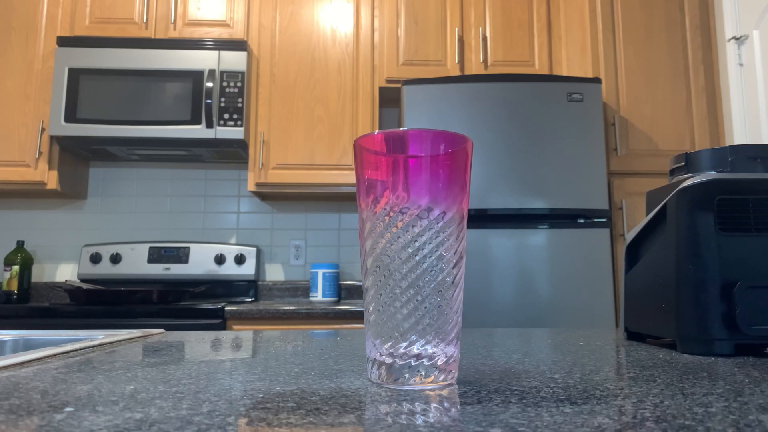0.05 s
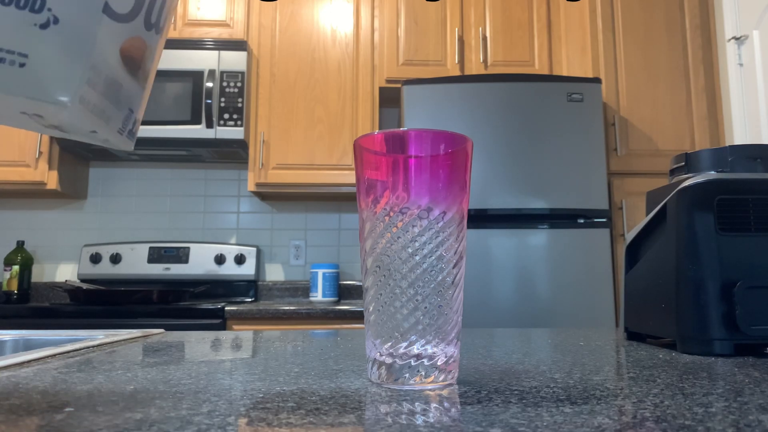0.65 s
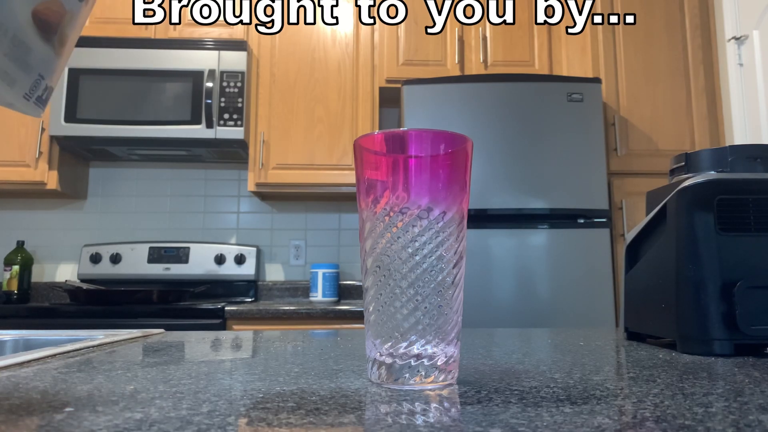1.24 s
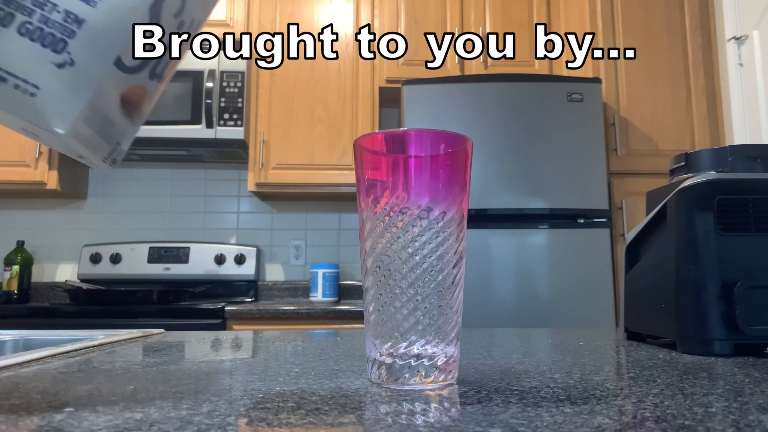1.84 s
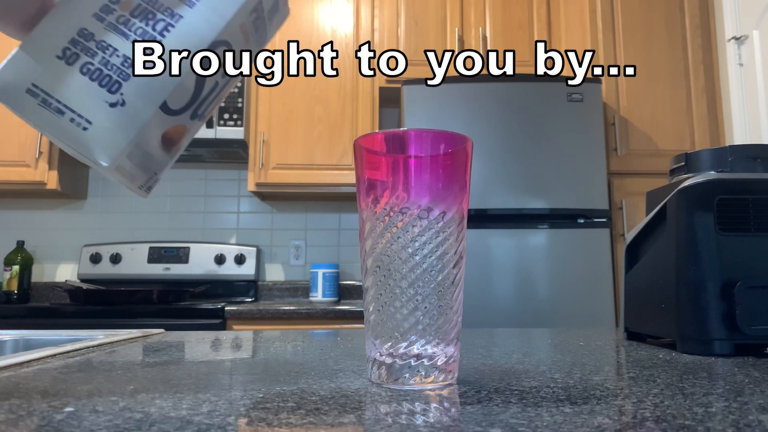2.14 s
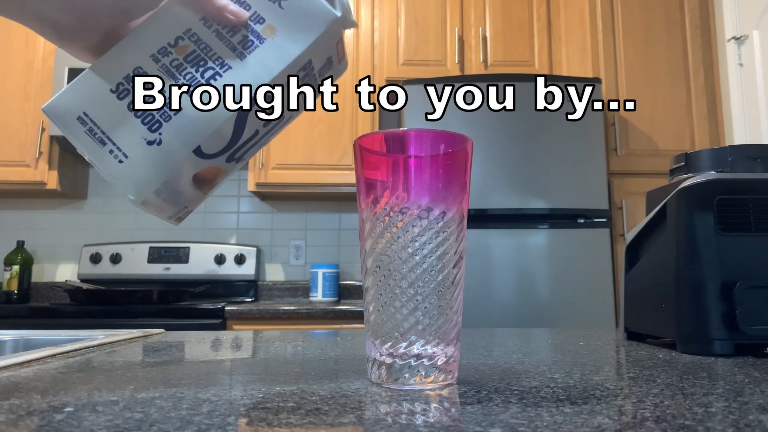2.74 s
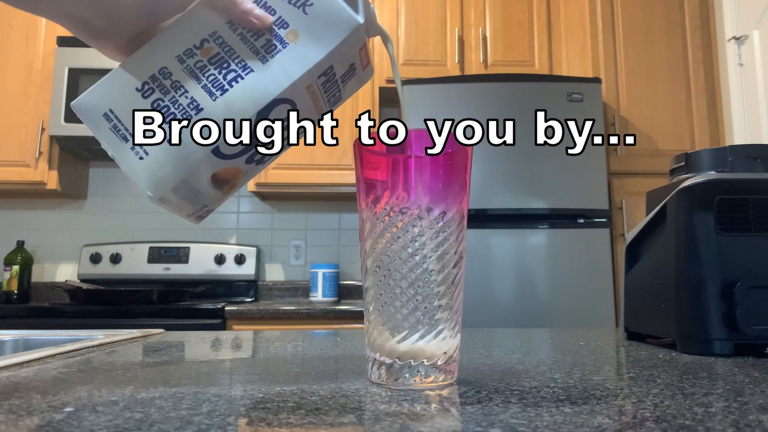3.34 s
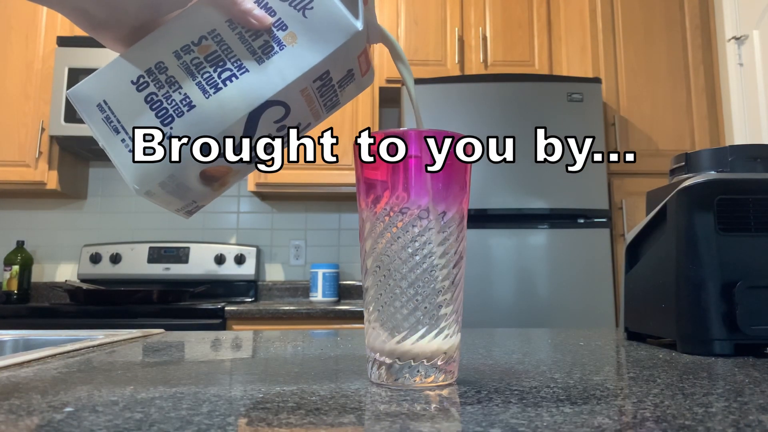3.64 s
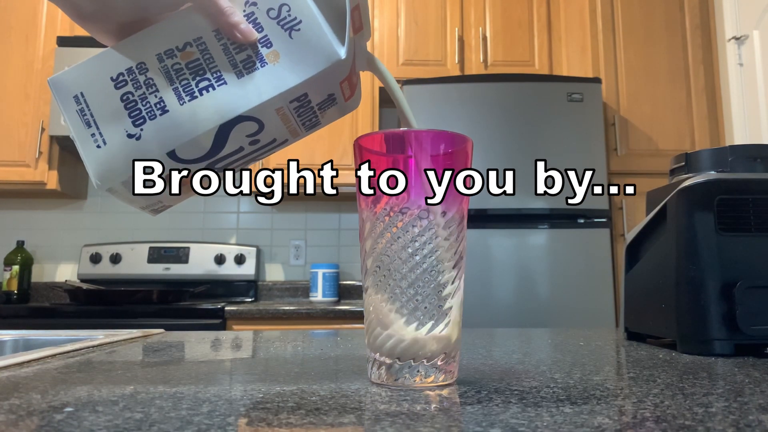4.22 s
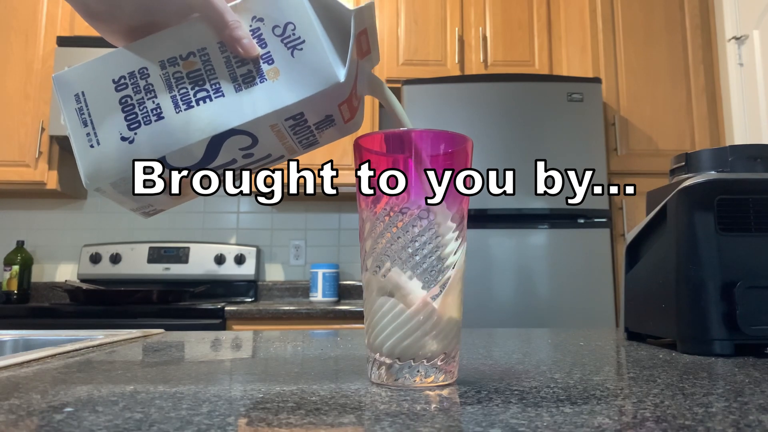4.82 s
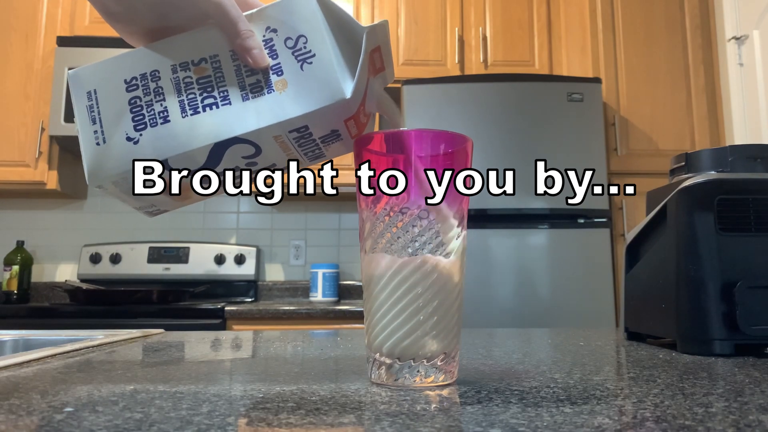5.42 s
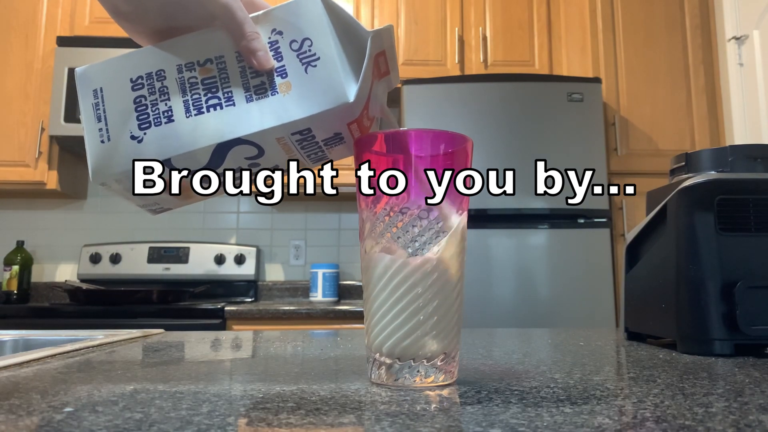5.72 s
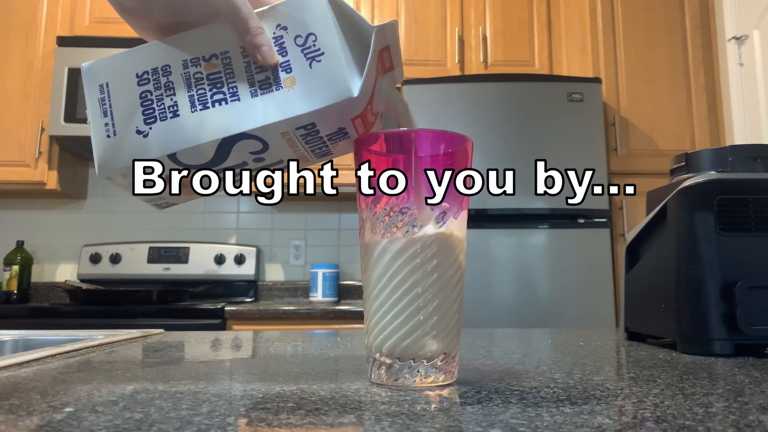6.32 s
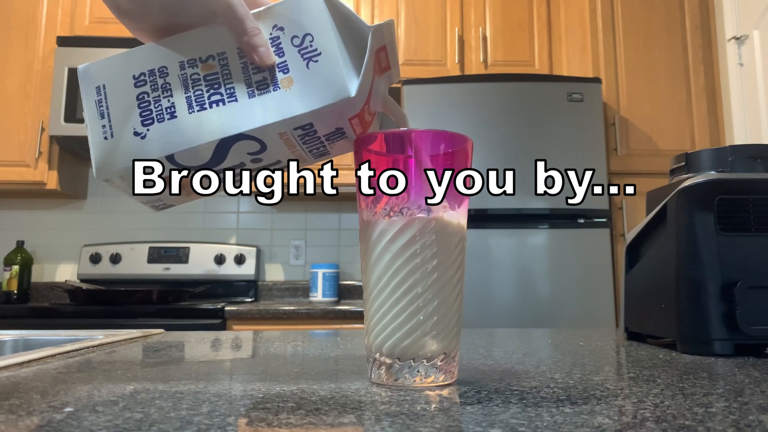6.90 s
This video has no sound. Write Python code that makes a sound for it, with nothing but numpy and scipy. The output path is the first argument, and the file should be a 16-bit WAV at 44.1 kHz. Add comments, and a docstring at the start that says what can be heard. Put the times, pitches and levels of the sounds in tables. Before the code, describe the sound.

A fridge hums in a kitchen while milk from a carton splashes, bubbles and glugs into a glass close by.

```python
"""Milk is poured into a tall glass on a kitchen counter, close by, after the carton lifts with soft swishes.
The stream traps bubbles that plink and fizz, and the air in the glass rises in pitch as it fills.
Tipped further, the carton glugs and drops slugs of milk that plop and spray.
The hard walls of the kitchen echo, and a fridge hums in the background."""
import sys
import numpy as np
from scipy import signal
from scipy.fft import rfft, irfft
from scipy.io import wavfile
from scipy.ndimage import uniform_filter1d

SR = 44100
rng = np.random.default_rng(int(sys.argv[2]) if len(sys.argv) > 2 else 0)


def wav_record(signal):
    """Record a signal, one row per channel, as 16-bit PCM in the file named by sys.argv[1]."""
    frames = np.transpose(np.atleast_2d(signal))
    bounded = np.clip(frames, -1, 1)
    # unit amplitude maps onto the largest positive 16-bit level
    quanta = np.round(bounded * 32767).astype(np.int16)
    wavfile.write(sys.argv[1], SR, quanta)


N = 311346

# How hard the milk churns. Each row: time in seconds, level of low fizz in dB, level of fine fizz in dB.
CHURN = [(3.899, -72, -71), (4.36, -56.5, -66), (4.66, -72, -69), (5.01, -54, -61), (5.22, -59, -61),
         (5.4, -60, -59), (5.8, -56, -50), (6.08, -49.5, -50.5), (6.52, -48.5, -51), (6.67, -50.5, -57.5),
         (6.79, -66, -64), (7.05, -57, -74)]
DROPLET_HZ = 4460  # pitch of a middle-sized droplet
SWELL_SHARE = 0.18  # part of its ring time that a plink or gurgle spends swelling


def undb(db):
    """Turn decibels into a gain."""
    return 10 ** (np.asarray(db) / 20)


def unit(x):
    """Scale a signal to an average (rms) level of one."""
    return x / np.sqrt(np.mean(x ** 2))


def at_hz(points, hz):
    """Read between (Hz, value) points, giving every octave the same room."""
    freqs, values = np.transpose(points)
    return np.interp(np.log(np.maximum(hz, 1)), np.log(freqs), values)


def colour(x, points):
    """Shape the tone of a sound with a curve of (Hz, dB) points."""
    n = x.shape[-1]
    return irfft(rfft(x) * undb(at_hz(points, np.fft.rfftfreq(n, 1 / SR))), n)


def band(x, lo_hz, hi_hz, order=2):
    """Keep the part of a sound between two frequencies."""
    sos = signal.butter(order, [lo_hz, min(hi_hz, SR / 2 - 1)], "band", fs=SR, output="sos")
    return signal.sosfilt(sos, x)


def add(out, s, x):
    """Mix x into out, starting at s seconds."""
    i = max(int(s * SR), 0)
    out[i:i + len(x)] += x[:max(len(out) - i, 0)]


def walk(per_s):
    """A smooth random wander, about one in size, with per_s steps a second."""
    hold = int(SR / per_s)
    steps = np.repeat(rng.standard_normal(N // hold + 1), hold)
    return unit(uniform_filter1d(uniform_filter1d(steps, hold), hold)[:N])


def seconds(length):
    """The time of each sample in a short sound."""
    return np.arange(int(length * SR)) / SR


def resonator(x, hz, width_hz):
    """Ring at a moving pitch: shift that pitch down to zero, smooth, and shift back."""
    carrier = np.exp(2j * np.pi * np.cumsum(hz) / SR)
    pole = np.exp(-np.pi * width_hz / SR)
    return 2 * np.real(carrier * signal.lfilter([1 - pole], [1, -pole], (x + 1e-18) / carrier))


def room_noise(spectrum, db, waver_db):
    """Steady noise that is alike at both ears in the bass and spread out higher up."""
    # Stereo width. Each row: frequency in Hz, side (what differs between the ears) against mid in dB.
    width = [(60, -12.5), (110, -18), (200, -13), (380, -4), (700, 0), (1300, 2), (2400, 0.5), (8000, 0.5),
             (15000, -18)]
    mid, side = unit(colour(rng.standard_normal((2, N)), spectrum))
    return undb(db + waver_db * walk(7.1)) * (mid + colour(side, width) * np.array([[1], [-1]]))


def fridge(waver_db=0.84, drift_hz=0.64, lean_left_db=0.52, ear_lag_s=0.00043):
    """The compressor rumbles, the motor's tones waver and the fan hisses faintly."""
    # Motor and fan tones. Each row: pitch in Hz, level in dB.
    hum = [(59.2, -58), (96.9, -51.5), (157, -51), (320, -64), (429, -72), (559.9, -65.5), (590, -68),
           (651.4, -66.5), (710.6, -64), (5141, -88), (5200, -94)]
    # Tone of the rumble and of the hiss. Each row: frequency in Hz, relative level in dB.
    rumble_curve = [(15, -32), (25, -34), (47, -1.5), (102, -8), (119, -4.5), (152, -3), (227, -8.5),
                    (253, -14), (324, -14), (396, -24), (421, -20.5), (448, -18.5), (723, -27), (757, -34),
                    (1000, -46), (1300, -77), (2200, -120)]
    hiss_curve = [(530, -8.5), (900, 5), (1030, 0.5), (2820, -11), (3460, -16.5), (4180, -10.5),
                  (5310, -19), (6820, -25), (11800, -32.5), (13300, -26), (15500, -39)]
    t = np.arange(N) / SR
    tones = 0
    for hz, db in hum:
        peak = np.sqrt(2) * undb(db + waver_db * walk(5.045))
        cycles = hz * t + drift_hz * np.cumsum(walk(8)) / SR
        tones += peak * np.sin(2 * np.pi * cycles)
    rumble = room_noise(rumble_curve, db=-42.5, waver_db=1.5)
    # The fan stands to the right, so its direct hiss reaches the left ear later.
    right = undb(-70) * unit(colour(rng.standard_normal(N), hiss_curve))
    left = np.roll(right, round(ear_lag_s * SR))
    hiss = np.array([left, right]) + room_noise(hiss_curve, db=-65, waver_db=-1.0)
    return (rumble + tones + hiss) * undb([[lean_left_db], [-lean_left_db]])


def kitchen(x, echo_db=-12, early_db=-8, early_s=0.0051, build_s=0.00033):
    """Counter and glass throw back quick reflections; tiles and cabinets ring on, differently per ear."""
    # Tone of the echo. Each row: frequency in Hz, relative level in dB.
    echo_curve = [(100, 5), (250, 11.6), (450, 6.8), (620, 1.6), (820, 4.5), (1400, 4.4), (2400, 9),
                  (4400, 10.8), (8000, 11.5), (15000, 4.7)]
    # Stereo width of the echo. Each row: frequency in Hz, side against mid in dB.
    echo_width = [(110, -17), (200, -15), (400, -3.5), (750, -6.5), (1400, 1), (2400, 1), (8000, -2),
                  (15000, -13)]
    # Length of the echo. Each row: frequency in Hz, seconds to fade by 60 dB.
    fade_times = [(100, 0.43), (620, 0.37), (1000, 0.3), (2500, 0.32), (6000, 0.34), (15000, 0.34)]
    t = seconds(0.96)
    edges_hz = np.geomspace(60, 16000, 13)
    tail = 0
    for lo, hi in zip(edges_hz, edges_hz[1:]):
        hz = np.sqrt(lo * hi)
        mid, side = band(rng.standard_normal((2, len(t))), lo, hi, order=3)
        width = undb(at_hz(echo_width, hz))
        ears = (mid + width * side * np.array([[1], [-1]])) / np.hypot(1, width)
        tail += ears * np.exp(-np.log(1000) * t / at_hz(fade_times, hz))
    tail = colour(unit(tail), echo_curve) * (1 - np.exp(-t / build_s))
    early_noise = band(rng.standard_normal((2, len(t))), 740, 8400, order=1)
    early = unit(early_noise * t * np.exp(-2 * t / early_s))
    response = (undb(echo_db) * tail + undb(early_db) * early) / np.sqrt(len(t))
    return x + signal.fftconvolve(x[None], response, axes=1)[:, :N]


def rim(x, delay_s=0.0004):
    """Short sound waves bounce off the rim of the glass and differ between the ears."""
    # Strength of the bounce. Each row: frequency in Hz, side against mid in dB.
    bounce_curve = [(500, -18), (1500, -40), (4400, -15), (8000, -11), (13000, -2.5)]
    return np.roll(colour(x, bounce_curve), int(delay_s * SR)) * np.array([[1], [-1]])


def handling(flutter_db=3.5):
    """Hand and carton brush softly as the carton is picked up and swung over."""
    # Each row: loudest moment in seconds, half length in seconds, level in dB, treble change in dB.
    swishes = [(0.01, 0.14, -71, 3), (0.506, 0.12, -74, 2.5), (1.187, 0.17, -69.5, -4.5)]
    # Tone of a swish. Each row: frequency in Hz, relative level in dB.
    swish_curve = [(700, -3), (1500, 5.5), (3000, -0.5), (5000, -4.5), (8000, -12), (15000, -21)]
    t = np.arange(N) / SR
    out = np.zeros(N)
    for s, half_s, db, treble_db in swishes:
        brush = unit(colour(rng.standard_normal(N), swish_curve))
        swell = np.exp(-((t - s) / half_s) ** 2 / 2)
        out += undb(db) * swell * colour(brush, [(3000, 0), (8000, treble_db)])
    return out * undb(flutter_db * walk(25))


def landing(at_s=3.04, half_s=0.11, db=-51.5, flutter_db=1.5):
    """The smooth stream meets the thick bottom of the empty glass with a low, soft drumming."""
    # Tone of the drumming. Each row: frequency in Hz, relative level in dB.
    drum_curve = [(100, -30), (200, 4), (290, -2), (360, -6), (430, -15), (800, -31), (2000, -62),
                  (6000, -85)]
    swell = np.exp(-((np.arange(N) / SR - at_s) / half_s) ** 2 / 2)
    return swell * undb(db + flutter_db * walk(20)) * unit(colour(rng.standard_normal(N), drum_curve))


def bubble(hz, db, swell_ms, ring_ms, glide, fade_power=1.33):
    """A pocket of air pinches off and rings until the milk stills it; its pitch slides as it rises."""
    ms = np.arange(int(3 * ring_ms * SR / 1000) + 2) * 1000 / SR
    t = ms / 1000
    swell = np.minimum(ms / max(swell_ms, .1), 1)
    fade = np.exp(-(ms / ring_ms) ** fade_power)  # a power above 1 holds on, then dies abruptly
    cycles = hz * t * (1 + glide * t / 2)  # a glide of 10 raises the pitch 1% each millisecond
    return undb(db) * swell * fade * np.sin(2 * np.pi * cycles)


def crackle(t, burst_samples=24):
    """Wet noise: tiny bursts of unequal size."""
    sizes = undb(4 * np.clip(rng.standard_normal(len(t) // burst_samples + 1), -2, 2))
    return rng.standard_normal(len(t)) * np.repeat(sizes, burst_samples)[:len(t)]


def churn_at(s, hz):
    """Level of the churning in dB at a given moment, for bubbles of a given pitch."""
    times, low_db, fine_db = np.transpose(CHURN)
    fine_share = at_hz([(2500, 0), (4500, 1)], hz)
    return (1 - fine_share) * np.interp(s, times, low_db) + fine_share * np.interp(s, times, fine_db)


def fizz(per_s=1000, gain_db=1.0, spread_db=5, glide=6, glide_spread=25):
    """Small bubbles swarm where the stream plunges in, each sliding its own way; the smallest die first."""
    # Tone of the fizz. Each row: bubble pitch in Hz, relative level in dB.
    fizz_curve = [(1000, -6), (1500, -16), (2400, -6.5), (3300, -10), (4300, -4.5), (5500, -9), (7000, -10),
                  (9500, -12.5), (15000, -26)]
    out = np.zeros(N)
    first, last = CHURN[0][0], CHURN[-1][0]
    when, height, loud, length, rise = rng.random((int(per_s * (last - first)), 5)).T
    starts = first + when * (last - first)
    pitches = 1000 * 15 ** height  # 1 to 15 kHz
    extra_db = spread_db * np.minimum(-np.log(1 - loud), np.pi)  # a few bubbles stand out
    levels = churn_at(starts, pitches) + at_hz(fizz_curve, pitches) + gain_db + extra_db
    rings_ms = (0.8 + 1.4 * length) * np.sqrt(4000 / pitches)
    slides = glide + glide_spread * (2 * rise - 1)
    for s, hz, db, ring_ms, slide in zip(starts, pitches, levels, rings_ms, slides):
        add(out, s, bubble(hz, db, ring_ms / 5, ring_ms, slide))
    return out


def gurgle(start_s=4.88, end_s=6.62, per_s=70, middle_hz=2640, octaves=1.76, spread_db=9):
    """Middle-sized bubbles chirp while the stream plunges deep, louder as the milk churns harder."""
    out = np.zeros(N)
    for when, height, loud, rise in rng.random((int(per_s * (end_s - start_s)), 4)):
        s = start_s + when * (end_s - start_s)
        hz = middle_hz * 2 ** (octaves * (height - .5))
        db = churn_at(s, hz) + spread_db * (loud - .5)
        ring_ms = 2.9 * middle_hz / hz
        add(out, s, bubble(hz, db, SWELL_SHARE * ring_ms, ring_ms, glide=8 + 30 * (rise - .5)))
    return out


def swarm(length_ms, lo_hz, hi_hz, straggle=1.6, spread_db=18, fade_db=11, droplet_ms=1.9):
    """A burst of tiny bubbles, crowded at its start and trailing off."""
    out = np.zeros(SR // 5)
    count = 4 + int(length_ms / 2)
    for when, height, loud in rng.random((40, 3))[:count]:
        hz = lo_hz * (hi_hz / lo_hz) ** height
        ring_ms = droplet_ms * np.sqrt(DROPLET_HZ / hz)
        late = when ** 1.4
        ping = bubble(hz, spread_db * loud - fade_db * late, ring_ms / 3, ring_ms, glide=8)
        add(out, straggle * length_ms * late / 1000, ping)
    return out * np.sqrt(length_ms * SR / 1000 / np.sum(out ** 2))  # a power of one over length_ms


def splashes(droplets_db=-2.5, mist_db=-9, mist_stretch=1.6, mist_attack_s=0.0016):
    """Milk slaps the glass and breaks into droplets and bubbles of five sizes; a fine mist fizzes on."""
    # Each row: start in seconds, base length in ms, relative level in dB, brightness in dB per octave.
    hits = [(3.516, 6, -74, -10), (3.945, 13.6, -61.5, -2), (4.23, 11.3, -58, -3.5), (4.289, 18, -56, 2),
            (4.638, 22, -60, -1.5), (4.659, 13, -63, 4), (4.687, 20, -56, -3.5), (4.81, 5.1, -63, 0),
            (4.874, 14, -65, -12), (4.886, 30.4, -56.5, -9), (4.897, 24, -63.5, 3), (5.036, 8.6, -60.5, -4),
            (5.056, 7.4, -56, -3), (5.097, 6.1, -58, -8.5), (5.13, 6.4, -61, -8), (5.222, 6, -59, -3.5),
            (5.244, 9.6, -57, -3), (5.288, 15.5, -62, 8.5), (5.321, 16, -50.5, -7),
            (5.369, 11.4, -56, -5.5), (5.53, 14.5, -54.5, -4), (5.553, 14, -68, 2), (5.582, 13, -62, -12),
            (5.712, 16.4, -56, 2), (5.761, 6.5, -54, -2), (5.782, 22, -55, -7), (5.866, 11.5, -50, 1),
            (5.873, 18, -49.5, 0), (6.004, 8.6, -51, -5), (6.031, 32, -61.5, -15), (6.115, 7.6, -53, 0.5),
            (6.209, 9, -47, -0.5), (6.4257, 9.5, -46, 7.5), (6.499, 10.4, -58, -11), (6.545, 6.2, -46, -6),
            (6.603, 24, -53.5, 6.5)]
    # Droplet sizes. Each row: lowest pitch in Hz, highest pitch in Hz, relative level in dB.
    droplets = [(1525, 3380, 0), (3640, 5240, -4.5), (5500, 8000, -2), (8280, 11440, -3),
                (11900, 15400, -10)]
    out = np.zeros(N)
    t = seconds(.2)
    for s, length_ms, db, brightness_db in hits:
        mist_curve = [(800, -40)]
        for lo, hi, size_db in droplets:
            hz = np.sqrt(lo * hi)
            band_db = size_db + brightness_db * np.log2(hz / DROPLET_HZ)
            add(out, s, undb(db + band_db + droplets_db) * swarm(length_ms, lo, hi))
            narrow_db = 10 * np.log10(SR / 2 / (hi - lo))  # a narrow band needs a boost to be as strong
            mist_curve.append((hz, band_db + narrow_db))
        mist_s = mist_stretch * length_ms / 1000
        fade = (1 - np.exp(-t / mist_attack_s)) * np.exp(-t / mist_s)
        add(out, s, undb(db + mist_db) * fade * colour(unit(crackle(t)), mist_curve))
    return out


def glass(x, direct_db=-3.5, slosh_share=0.047):
    """The air above the milk rings like a pipe that shortens as the glass fills; the wall rings too."""
    # Lowest note of that air. Each row: time in seconds, pitch in Hz.
    air_pitch = [(3.9, 556), (4.9, 507), (5.7, 630), (6.201, 810), (6.6, 835), (7.05, 860)]
    # All its notes. Each row: multiple of the lowest pitch, width in Hz, gain in dB.
    air_notes = [(1, 207, 11.5), (3, 69, -4.5), (5.2, 190, -16), (8, 220, -8)]
    # Faint notes of the wall, struck by droplets. Each row: pitch in Hz, width in Hz, gain in dB.
    wall_notes = [(4200, 50, -2), (4720, 60, -6), (6760, 90, -2), (7250, 53, -9), (10380, 90, -2),
                  (12600, 120, 4)]
    lowest_hz = np.interp(np.arange(N) / SR, *np.transpose(air_pitch))
    lowest_hz *= 1 + slosh_share * walk(30)  # sloshing makes the pitch waver
    air = sum(undb(db) * resonator(x, multiple * lowest_hz, width) for multiple, width, db in air_notes)
    wall = sum(undb(db) * band(x + 1e-18, hz - width / 2, hz + width / 2, order=1)
               for hz, width, db in wall_notes)
    return undb(direct_db) * x + air + wall


def free_bubble(hz, db, glide, middle_ms=11, middle_hz=1020, rise_stretch_s=0.023):
    """A bubble in open milk: small ones die soonest, rising ones last longer."""
    ring_ms = middle_ms * (middle_hz / hz) * np.exp(rise_stretch_s * glide)
    return bubble(hz, db, SWELL_SHARE * ring_ms, ring_ms, glide, fade_power=2.1)


def plinks(gain_db=1.0, tear_db=-15, tear_s=0.0065, reach_hz=1000):
    """The stream drags larger bubbles under; each tears off with a brief wet crackle around its pitch."""
    # Each row: start in seconds, pitch in Hz, relative level in dB, pitch glide per second.
    bubbles = [(3.039, 4450, -61, 0), (3.516, 1850, -47, 0), (3.517, 1450, -53, -12),
               (3.983, 1230, -47.5, 5), (4.005, 1360, -49, 11.5), (4.087, 5900, -52.5, -4),
               (4.171, 5600, -46, -12), (4.211, 4320, -35.5, -17), (4.232, 3580, -44, 0),
               (4.233, 2760, -41.5, -4), (4.243, 770, -46, 8), (4.291, 796, -47.5, 12.5),
               (4.311, 1040, -48, 24), (4.321, 4480, -36.5, -24), (4.367, 1445, -41, 3),
               (4.444, 2240, -54, 6), (4.495, 1863, -52, -11), (4.521, 640, -28, 6.5),
               (4.533, 6700, -47.5, -7), (4.619, 1614, -34, 1), (4.621, 600, -27, -4),
               (4.659, 2470, -40.5, 2), (4.688, 653, -37.5, 12.5), (4.813, 2780, -41.5, 4),
               (4.887, 1510, -30, -17), (4.901, 1700, -37, -14), (4.909, 1100, -39, -17),
               (4.919, 594, -18, 2), (4.962, 825, -48, 21), (4.962, 7130, -47.5, 2), (4.976, 1910, -52, 40),
               (4.99, 1530, -38.5, 18), (4.999, 2300, -47, 18), (5.013, 1640, -42.5, 13),
               (5.038, 2610, -38.5, -12), (5.038, 735, -43, 2.5), (5.071, 1390, -47, -2),
               (5.059, 12400, -51, 0), (5.072, 2660, -44.5, 16), (5.099, 7040, -39, -21),
               (5.132, 2930, -45, -5), (5.132, 6600, -44, -2), (5.223, 4020, -43.5, 2),
               (5.244, 4300, -41.5, 2), (5.267, 1850, -45, -14), (5.271, 923, -42.5, 17),
               (5.321, 1136, -32.5, -12), (5.321, 1515, -35.5, -4), (5.332, 1570, -43, 17.5),
               (5.405, 1440, -50, -6), (5.373, 4870, -40, 0), (5.467, 4030, -51.5, 0),
               (5.5, 9680, -49.5, -5), (5.53, 4560, -32, -16), (5.532, 1371, -46.5, 24),
               (5.567, 698, -38.5, -6.5), (5.577, 2238, -36.5, 17), (5.587, 8100, -44, 0),
               (5.629, 6370, -51, 0), (5.677, 4800, -42.5, 0), (5.706, 1128, -35, -14),
               (5.762, 3070, -42, -8), (5.798, 2500, -46, 3), (5.878, 6260, -32, -9),
               (5.942, 1875, -42.5, 4), (5.962, 12100, -46, 0), (6.005, 4500, -44, 0),
               (6.03, 2870, -46, -4), (6.04, 2330, -42.5, 6), (6.055, 1860, -40, -8),
               (6.098, 2240, -41.5, 8), (6.156, 4230, -35.5, -5), (6.168, 1810, -44, 12),
               (6.209, 2360, -35, 3), (6.2097, 4210, -34.5, -2), (6.234, 784, -32, 0),
               (6.262, 7725, -49, -2), (6.291, 10900, -51, 0), (6.318, 833, -36, -6), (6.328, 2670, -41, 8),
               (6.354, 857, -30.5, -5), (6.401, 1820, -45, -3), (6.437, 790, -42, -2),
               (6.458, 2210, -36.5, -11), (6.501, 1385, -34.5, 5), (6.508, 1680, -36.5, -6),
               (6.539, 4550, -42, 3), (6.605, 2520, -40, 0), (6.643, 2520, -43, 0), (6.644, 4730, -51, 0),
               (6.691, 2650, -48, -1), (6.736, 11400, -50, 0), (6.774, 6500, -53, -7),
               (6.829, 4840, -59, 0), (6.856, 12800, -55, 0), (6.92, 1780, -47.5, -3),
               (6.94, 2600, -51, 13), (6.975, 4880, -57, -2)]
    out = np.zeros(N)
    t = seconds(.04)
    tear_fade = (1 - np.exp(-2 * t / tear_s)) * np.exp(-t / tear_s)
    for s, hz, db, glide in bubbles:
        add(out, s, free_bubble(hz, db, glide))
        tear_curve = [(hz / 2, -48), (hz, 0), (hz + reach_hz, -12), (2 * hz + reach_hz, -48)]
        add(out, s, undb(db + tear_db) * tear_fade * unit(colour(crackle(t), tear_curve)))
    return out * undb(gain_db)


def carton_thump(t, detune=0.052):
    """The carton's air and walls ring as it gulps; sloshing milk shifts the notes a little each time."""
    # Each row: pitch in Hz, relative level in dB, seconds to fade by 60 dB.
    notes = [(124, -4, 0.14), (209, -4, 0.095), (252.7, -1.5, 0.087), (323, -8.5, 0.12)]
    out = np.zeros(len(t))
    for hz, db, fade_s in notes:
        shifted_hz = hz * (1 + detune * rng.standard_normal())
        out += undb(db) * np.exp(-np.log(1000) * t / fade_s) * np.sin(2 * np.pi * shifted_hz * t)
    return out


def glugs(thump_gain_db=5, thump_delay_s=0.00275, slap_lead_s=0.001008, attack_s=0.00029):
    """The carton thumps as it gulps air; a slug of milk slaps the surface, plops and sprays."""
    # Each row: start in seconds, plop pitch in Hz, plop level in dB, pitch glide per second,
    # plop ring time in ms, relative thump level in dB, relative spray level in dB.
    gulps = [(5.709, 665, -36, 1, 17, -52, -43.5), (5.878, 715, -36.5, 4, 9.4, -44.5, -49),
             (6.016, 680, -35, 13, 4.1, -37.5, -41.5), (6.073, 780, -24, 5, 4.1, -33.5, -41),
             (6.176, 780, -18, 4, 6.8, -38, -41), (6.208, 880, -38, 7, 5.6, -40.5, -42),
             (6.367, 690, -31, -8, 8.5, -36, -38), (6.4249, 740, -10.5, 13, 7.5, -26, -35.5),
             (6.454, 650, -29, -9, 5, -36.5, -60), (6.54, 783, -17, 6, 3.6, -41, -44.5),
             (6.6042, 787, -9, 10, 4.7, -31.5, -47)]
    # Tone of the spray. Each row: frequency in Hz, relative level in dB.
    spray_curve = [(400, 3), (780, 9.5), (1100, 7), (1600, 5), (2400, 6.5), (3300, -3), (4400, 3),
                   (6800, -7), (8500, -11), (10500, -7), (15500, -21)]
    plops, sprays = np.zeros(N), np.zeros(N)
    t = seconds(.2)
    slap = undb(5) * np.exp(-t / 0.0019)
    spray_tail = undb(-2) * np.exp(-t / 0.01)
    burst = (1 - np.exp(-t / attack_s)) * (slap + spray_tail)
    for s, hz, db, glide, ring_ms, thump_db, spray_db in gulps:
        add(plops, s, bubble(hz, db, swell_ms=2.38, ring_ms=ring_ms, glide=glide))
        add(plops, s + thump_delay_s, undb(thump_db + thump_gain_db) * carton_thump(t))
        add(sprays, s - slap_lead_s, undb(spray_db) * unit(colour(crackle(t), spray_curve)) * burst)
    return plops, sprays


def scene(lean_left_db=0.22):
    """The pour and the carton's swishes echo in the kitchen, over the fridge."""
    plops, sprays = glugs()
    pour = plinks() + gurgle() + plops + landing() + glass(sprays + splashes() + fizz())
    in_room = kitchen(pour + handling()) + rim(pour)
    return in_room * undb([[lean_left_db], [-lean_left_db]]) + fridge()


def record(dry, low_cut_hz=39, high_cut_hz=15800):
    """Cut the deepest rumble and the highest treble."""
    dry = signal.sosfilt(signal.butter(8, low_cut_hz, "high", fs=SR, output="sos"), dry)
    return signal.sosfilt(signal.ellip(10, .2, 80, high_cut_hz, fs=SR, output="sos"), dry)


dry = scene()
out = record(dry)
wav_record(out)
```